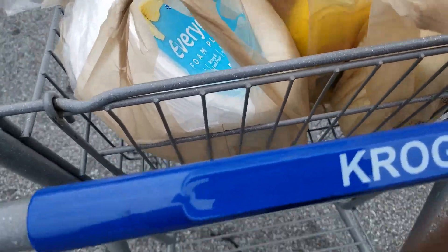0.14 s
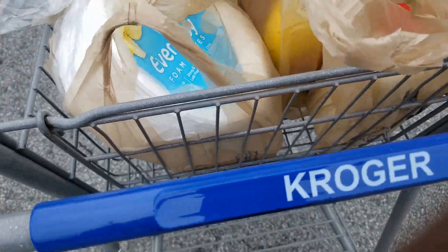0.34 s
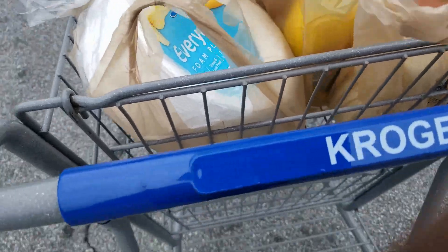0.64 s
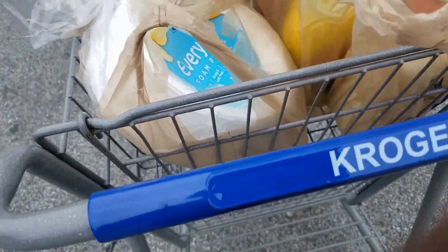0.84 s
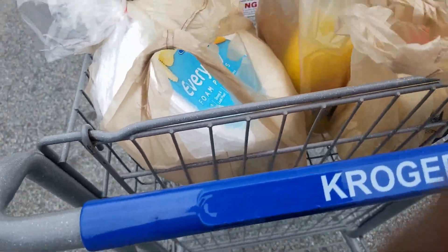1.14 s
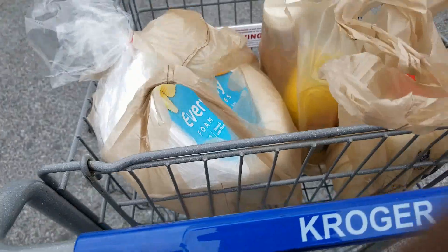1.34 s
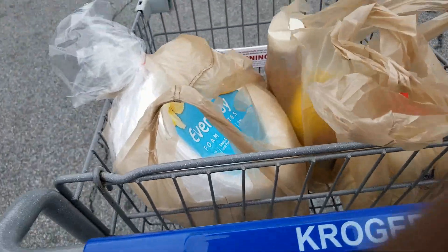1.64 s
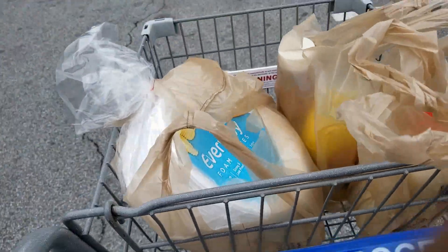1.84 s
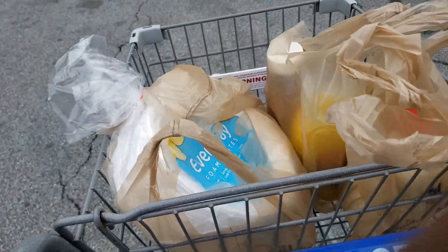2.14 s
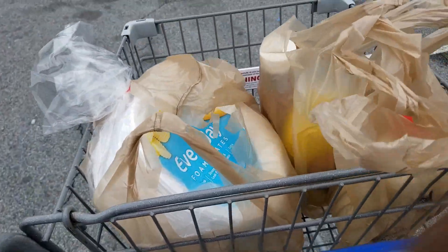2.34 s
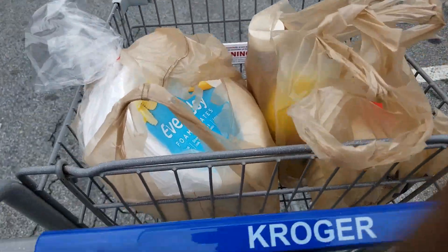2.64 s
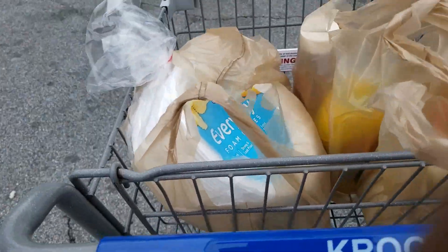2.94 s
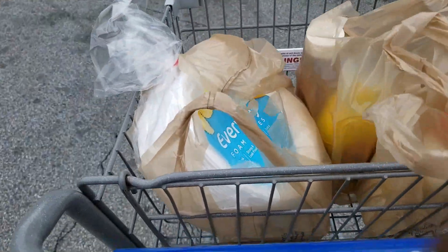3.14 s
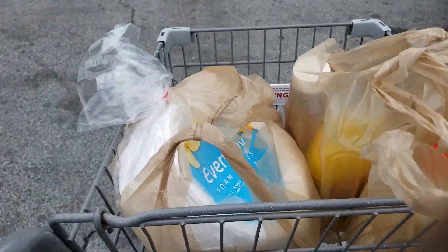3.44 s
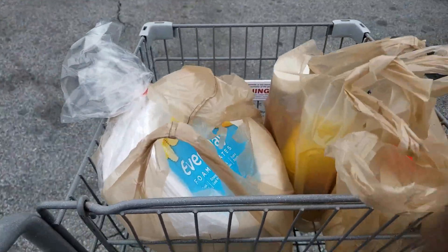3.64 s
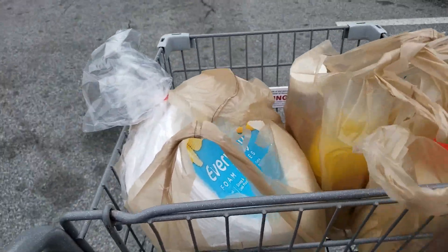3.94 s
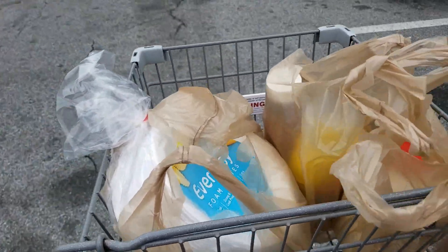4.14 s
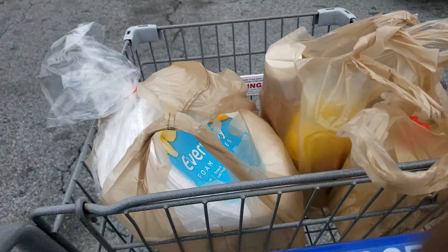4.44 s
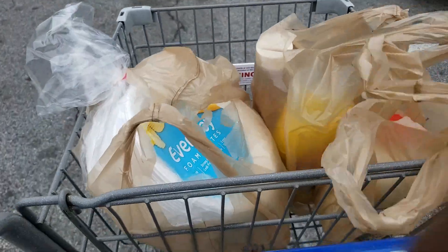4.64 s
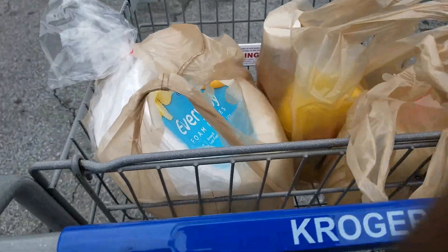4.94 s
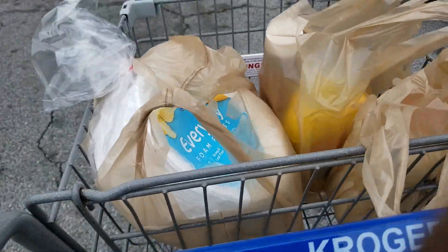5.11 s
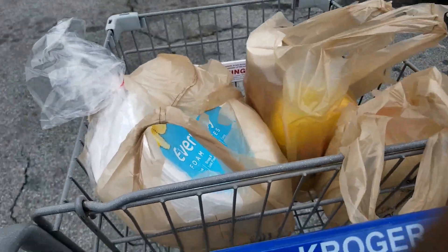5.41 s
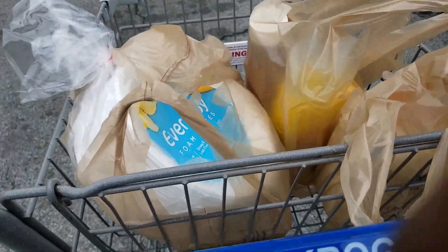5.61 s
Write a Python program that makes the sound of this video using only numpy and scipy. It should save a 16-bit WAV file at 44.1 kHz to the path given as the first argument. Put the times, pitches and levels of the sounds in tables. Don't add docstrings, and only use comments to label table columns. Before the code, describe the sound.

Close, bright wire basket rattle fills the whole stretch, easing slightly before two seconds, then surging with hard metallic knocks. Hard wheels grind softly on rough pavement. Thin plastic ticks now and then, and soft finger taps touch the left side of the phone around 2.6 seconds. Faint wavering engine idle and far traffic lie underneath in the open air, with the right channel clearer and brighter.

```python
import sys
import numpy as np
from scipy import signal
from scipy.fft import rfft, irfft, next_fast_len
from scipy.io import wavfile
from scipy.ndimage import uniform_filter1d

SR = 44100
rng = np.random.default_rng(int(sys.argv[2]) if len(sys.argv) > 2 else 0)


def amplitude_ratio(level_db):
    exponent = np.asarray(level_db, float) / 20
    return 10 ** exponent


def dump_mix(stems):
    frames = np.atleast_2d(stems).T
    limited = np.clip(frames, -1, 1)
    pcm = np.round(limited * 32767).astype(np.int16)
    wavfile.write(sys.argv[1], SR, pcm)


N = 254456


def curves(rows):
    s, *columns = np.transpose(rows)
    return [np.interp(np.arange(N) / SR, s, column) for column in columns]


def on_log(points, hz):
    point_hz, value = np.transpose(points)
    return np.interp(np.log(hz + 1), np.log(point_hz), value)


def unit(x):
    return x / np.sqrt(np.mean(x ** 2))


def convolve(x, response):
    size = next_fast_len(x.shape[-1] + response.shape[-1])
    return irfft(rfft(x, size) * rfft(response, size), size)[..., :x.shape[-1]]


def colour(x, points, size=2048):
    hz = np.arange(size // 2 + 1) * SR / size
    cepstrum = irfft(np.log(amplitude_ratio(on_log(points, hz))), size)
    cepstrum[1:size // 2] *= 2
    cepstrum[size // 2 + 1:] = 0
    return convolve(x, irfft(np.exp(rfft(cepstrum)), size))


def walk(rate, count=1):
    hold = int(SR / rate)
    levels = np.repeat(rng.standard_normal((count, N // hold + 1)), hold, axis=1)
    return uniform_filter1d(levels, hold, axis=1)[:, :N]


def pair(likeness_hz):
    common, left, right = rng.standard_normal((3, N))
    low = signal.lfilter(*signal.butter(2, likeness_hz, fs=SR), common)
    own = signal.lfilter(*signal.butter(1, likeness_hz, "high", fs=SR), [left, right])
    ground_lag = 5
    return own + [np.roll(low, ground_lag), low]


def far_traffic():
    # f/Hz, level/dB per Hz
    hum = [(12, -57), (20, -18), (67, -1.5), (97, -3.5), (120, 2.5), (162, -8.5), (285, -9.5), (344, -14.5),
           (400, -14), (520, -57), (880, -120)]
    level_db = -43.5
    swell = amplitude_ratio(0.97 * walk(1.583))
    return unit(colour(pair(240) * swell, hum, size=16384)) * amplitude_ratio(level_db)


def engine(count=16):
    # t/s, cycle f/Hz, level/dB, load as firing line over the other lines/dB
    idle = [(0, 18.7, -41, 7), (.15, 17.8, -46.5, 9), (.4, 16.3, -37.5, -11), (.7, 15, -49, -6),
            (.95, 15.4, -48, -5), (1.3, 16, -44, -12), (1.65, 16.4, -40, -3.5), (2.3, 14.9, -45, -1),
            (2.6, 13.5, -44, -4), (2.8, 15.6, -41, 0.5), (3, 16.6, -41.5, 2.5), (3.4, 17.1, -37, -3),
            (3.9, 16.5, -41.5, 0.5), (4.6, 16.5, -44, -1), (4.9, 17.2, -42, -3.5), (5.15, 18.9, -46, 1),
            (5.35, 19.8, -43.5, -9), (5.77, 17.3, -44.5, 1)]
    # f/Hz, level/dB
    exhaust = [(35, -31), (50, -21), (62, -2), (82, -3.5), (100, 3.5), (118, -6.5), (135, -11), (165, -16),
               (230, -16.5), (270, -29)]
    cylinders, port_lag = 6, 13
    hz, db, firing_db = curves(idle)
    turn = 2 * np.pi * np.cumsum(hz) / SR
    order = np.arange(1, count + 1)[:, None]
    start = 2.14 * rng.standard_normal(order.shape)
    waver, drift = walk(3.3, count=count), walk(6, count=count)
    line_level = amplitude_ratio(on_log(exhaust, order * hz) + 2.6 * waver)
    lines = line_level * np.sin(order * turn + start + 0.62 * drift)
    uneven = unit(np.sum(np.delete(lines, cylinders - 1, axis=0), axis=0))
    firing = amplitude_ratio(firing_db + 4.5) * np.sin(cylinders * turn + 0.74 * drift[cylinders - 1])
    tone = amplitude_ratio(db - 0.2) * (uneven + firing)
    return np.array([np.roll(tone, port_lag), tone])


def bright_ticks():
    # t/s, peak level/dB
    tick_rows = [
        (0.2049, -17),
        (1.8508, -25),
        (1.9021, -17),
        (2.1246, -11),
        (2.7061, -21),
    ]
    out, t = np.zeros(N), np.arange(1024) / SR
    for (s, db), noise in zip(tick_rows, rng.standard_normal((len(tick_rows), 1024))):
        first = int(s * SR)
        bright = np.diff(noise, prepend=0)
        out[first:first + 1024] += amplitude_ratio(db - 18) * bright * np.exp(-t / 0.0023)
    return out


def finger_taps():
    # t/s, peak level/dB, f/Hz
    taps = [
        (2.559, -32, 250.3),
        (2.5695, -27, 252),
        (2.706, -27, 269.3),
        (2.7235, -29, 240),
        (2.773, -34, 350),
    ]
    out, t = np.zeros((2, N)), np.arange(N) / SR
    for s, db, hz in taps:
        age = np.maximum(t - s, 0)
        out[0] -= amplitude_ratio(db) * np.sin(2 * np.pi * hz * age) * np.exp(-(age / 0.0036) ** 4)
    return out


def shaking():
    # t/s, level/dB
    grain = [(0, -31.5), (.9, -33.5), (1.5, -30.5), (1.69, -38.5), (2.1, -36), (2.33, -23.5), (2.58, -34.5),
             (2.7, -34), (2.85, -25), (3.15, -28), (3.24, -34), (3.54, -25), (3.77, -32), (4.28, -31.5),
             (4.38, -39), (4.57, -23), (4.78, -29), (5.4, -31.5)]
    # start t/s, length/s, level/dB
    patches = [(0, 0.14, -25.5), (0.199, 0.015, -28.5), (0.28, 0.11, -29), (0.441, 0.046, -32),
               (0.541, 0.07, -31.5), (0.702, 0.058, -34.5), (1.082, 0.15, -27), (1.25, 0.028, -28),
               (1.399, 0.06, -28), (1.57, 0.024, -33), (1.74, 0.062, -36), (1.901, 0.085, -29.5),
               (2.126, 0.059, -28.5), (2.4, 0.089, -28.5), (2.52, 0.032, -39), (2.72, 0.061, -29),
               (2.815, 0.035, -24), (3.078, 0.083, -26.5), (3.412, .1, -29.5), (3.782, 0.031, -26.5),
               (3.874, .2, -29), (4.415, 0.032, -24), (4.597, 0.092, -28.5), (4.838, .05, -26),
               (4.894, 0.063, -21.5), (5.078, 0.036, -30.5), (5.411, 0.049, -30.5), (5.525, 0.07, -23.5),
               (5.62, .03, -28.5), (5.736, .03, -27)]
    rise_s, settle_db_per_s = 0.0041, 453
    t, power = np.arange(N) / SR, amplitude_ratio(2 * curves(grain)[0])
    for s, length, db in patches:
        rise = np.clip((t - s) / rise_s, 0, 1)
        calming_db = settle_db_per_s * np.maximum(t - s - length, 0)
        power = power + rise * amplitude_ratio(2 * (db - calming_db))
    return 10 * np.log10(power)


def wheels(shake_db):
    # f/Hz, level/dB per Hz
    rumble = [(82, -31.5), (140, -4), (280, -13), (336, -6.5), (438, -9.5), (687, -7), (938, -11),
              (1920, -10.5), (2200, -8), (2860, -24.5), (4840, -120)]
    frame_db = uniform_filter1d(shake_db, size=SR // 14)
    roll_db = -48 + 0.6153 * (frame_db + 29)
    grit = amplitude_ratio(1.6 * walk(40) + 0.4 * walk(12))
    return unit(colour(pair(1020) * grit, rumble)) * amplitude_ratio(roll_db + 6)


def jolts(shake_db, count=90):
    # t/s, peak level/dB, low wires minus peak/dB
    hardest = [(0.042, -8, -10), (0.2049, -18, -4), (0.3118, -10, -12.5), (0.5385, -14, -12),
               (0.7121, -19, -6), (1.0895, -9, -11), (1.1364, -6.5, -10), (1.2608, -12, -18),
               (1.7794, -17.5, -2), (1.85, -20, -4), (1.9018, -16, -15), (2.1246, -18, -20),
               (2.3114, -2, -19), (2.3998, -9, -18), (2.4572, -17, -19), (2.7061, -33, -15),
               (2.8253, -8.5, -8.5), (2.9248, -11.5, -8), (3.315, -19, -1), (3.5225, -4, -16),
               (3.8799, -5.5, -16), (4.0068, -8, -15), (4.2821, -13.5, -8), (4.4082, -13, -9),
               (4.6634, -3.5, -16), (4.8409, -9, -20), (4.9048, -16, -15), (5.5283, -13, -13),
               (5.6294, -7.5, -14), (5.7436, -16, -10)]
    when, luck = rng.random(count), rng.standard_normal((count, 2))
    top_db = -26.5
    local_db = np.minimum(shake_db[(when * N).astype(int)], top_db)
    db = local_db + 27 - 19.5 + 3 * luck[:, 0]
    low_rel_db = -13.5 + 4 * luck[:, 1]
    return [*hardest, *zip(when * N / SR, db, low_rel_db)]


def part_ring(size=8192):
    # f/Hz, level/dB per Hz
    mesh = [(500, -26), (900, -30), (1900, -13.5), (2700, -5.5), (3400, -3.5), (4000, -1), (5100, 0),
            (5500, -3), (7400, -0.5), (8200, 2.5), (10500, 4), (13000, 4.5), (15000, 0.5), (16500, 0.5)]
    # f/Hz, t60/s
    mesh_t60 = [(1000, 0.17), (2500, 0.35), (5000, 0.15), (9000, 0.21), (14000, 0.058)]
    # f/Hz, level/dB, t60/s
    wires = [(2260, -44, 0.033), (2536, -35, 0.093), (2880, -28.5, 0.08), (3064, -25.5, 0.035),
             (3152, -24, 0.13), (3927, -27.5, 0.06), (4087, -27.5, 0.13), (5220, -27, 0.24),
             (6475, -23, 0.13), (7100, -22.5, 0.031), (7730, -19, 0.1), (8180, -24, 0.054),
             (8140, -22, 0.07), (8880, -42, 0.13), (9350, -22, 0.14), (11900, -24, 0.13),
             (12380, -18.5, 0.091), (13600, -31, 0.069), (14680, -27, .12), (14860, -18.5, 0.18)]
    t, hz = np.arange(size) / SR, np.fft.rfftfreq(size, 1 / SR)
    noise, ring = rfft(rng.standard_normal((2, size))), 0
    for k, (_, t60) in enumerate(mesh_t60):
        share = on_log([(f, float(j == k)) for j, (f, _) in enumerate(mesh_t60)], hz)
        fade = amplitude_ratio(4.5 * rng.standard_normal() - 60 * t / t60) / np.sqrt(t60)
        ring = ring + irfft(noise * share, size) * fade
    ring = ring * (1 + 0.95 * np.exp(-t / 0.0029))
    ring = colour(ring, mesh)
    ring = ring / np.sqrt(np.sum(ring ** 2, axis=1, keepdims=True))
    for f, db, t60 in wires:
        strike, detune, turn = rng.standard_normal(3)
        port_phase = np.array([[3.7 * turn], [0]])
        phase = 2 * np.pi * f * (1 + 0.0042 * detune) * t + port_phase
        fade = amplitude_ratio(db + 3.5 * strike - 60 * t / t60) / np.sqrt(t60 * SR / 28)
        ring = ring + fade * np.sin(phase)
    return ring


def basket(shake_db, count=12, split_hz=6500):
    rate = 1000 / SR / count
    knocking = rng.random((count, N)) < rate
    sizes = knocking * amplitude_ratio(2.5 * np.minimum(rng.exponential(size=(count, N)), 2.8))
    small = unit(sizes) / np.sqrt(count) * amplitude_ratio(shake_db + 6.5)
    low_db = -4.5 - 0.165 * (shake_db + 30)
    high, low = small.copy(), small * amplitude_ratio(low_db + 6)
    knocks = jolts(shake_db)
    for (s, db, rel_db), chance in zip(knocks, rng.random((len(knocks), 2, 4))):
        parts = (chance[0] * count).astype(int)
        delay = 0.008 * (np.cumsum(chance[1]) - chance[1, 0])
        at = np.minimum((s + delay) * SR, N - 1).astype(int)
        later_db = 0.27 * (db - 2.5) * np.arange(4)
        high[parts, at] += amplitude_ratio(0.48 * db + 11.5 + later_db)
        low[parts, at] += amplitude_ratio(1.22 * db + rel_db + 28.5 + later_db)
    rings = np.array([part_ring() for _ in range(count)])
    under = signal.sosfiltfilt(signal.butter(4, split_hz, fs=SR, output="sos"), rings)
    strikes, responses = [*high, *low], [*(rings - under), *under]
    size = next_fast_len(N + rings.shape[-1])
    heard = sum(rfft(x, size) * rfft(h, size) for x, h in zip(strikes, responses))
    return irfft(heard, size)[:, :N]


def scene():
    # f/Hz, level/dB
    shade = [(50, -5.5), (200, -7.5), (700, -8), (1400, -7), (2500, -10), (4000, -16.5), (5600, -20.5),
             (7500, -30.5), (8400, -34), (8900, -18), (9400, -9), (12000, -14), (13800, -9.5), (15600, -8)]
    shake_db = shaking()
    cart = basket(shake_db) + wheels(shake_db)
    left, right = cart + bright_ticks() + engine() + far_traffic()
    return np.array([colour(left, shade), right]) + finger_taps()


def top_cut(x):
    return signal.sosfilt(signal.butter(12, 17090, fs=SR, output="sos"), x)


def record(dry):
    mix = signal.sosfilt(signal.ellip(14, 0.2, 80, 15750, fs=SR, output="sos"), dry)
    return top_cut(mix)


dry = scene()
out = record(dry)
dump_mix(out)
```